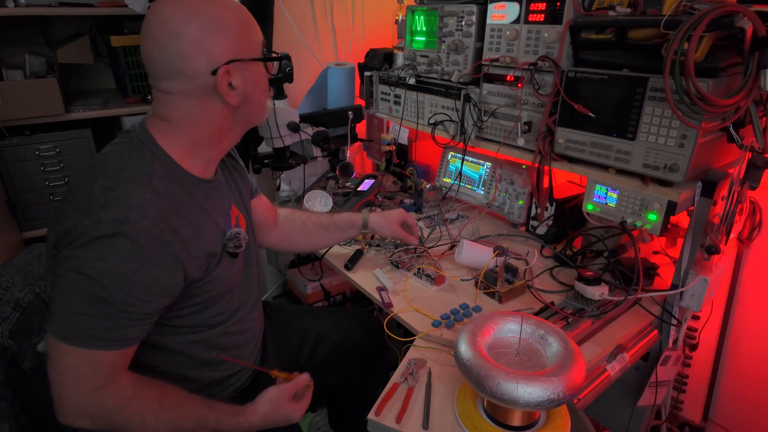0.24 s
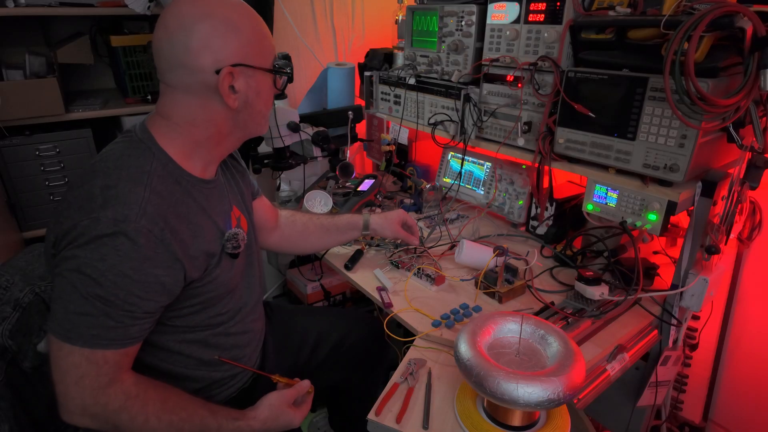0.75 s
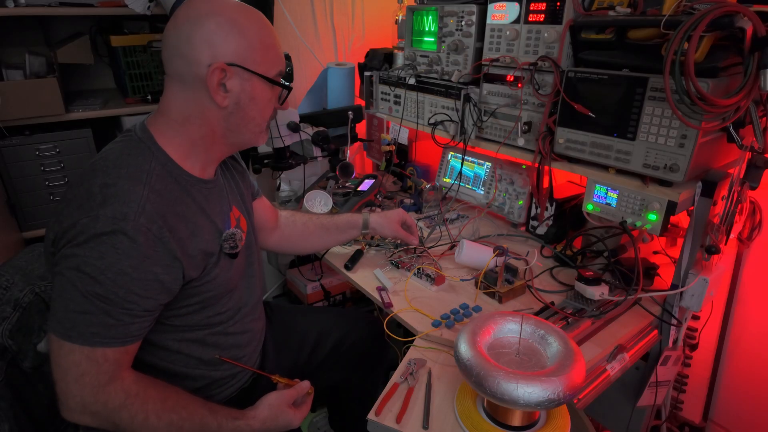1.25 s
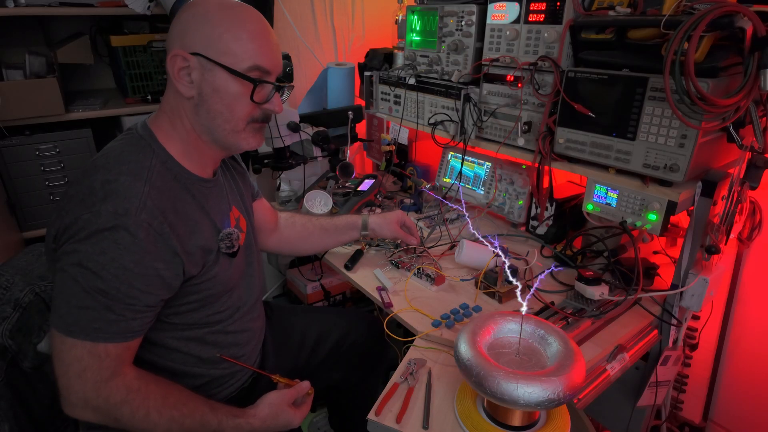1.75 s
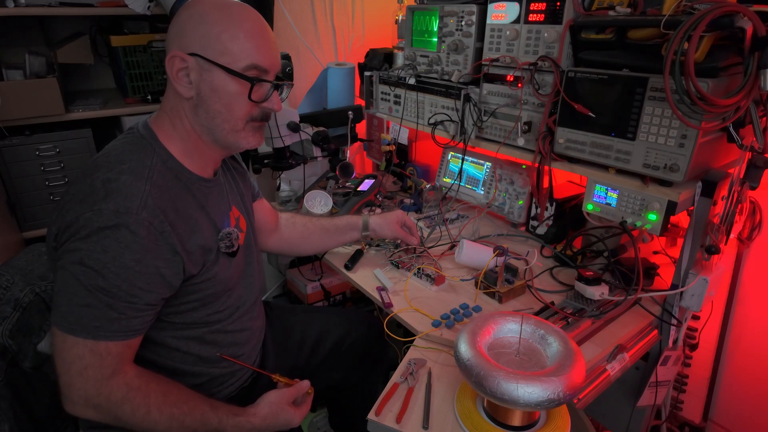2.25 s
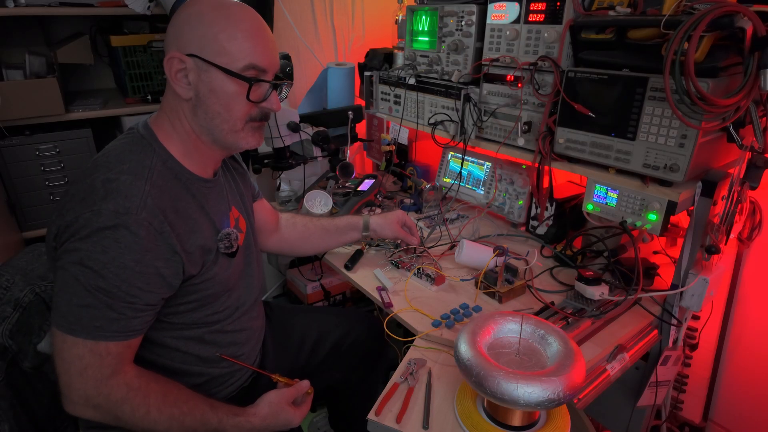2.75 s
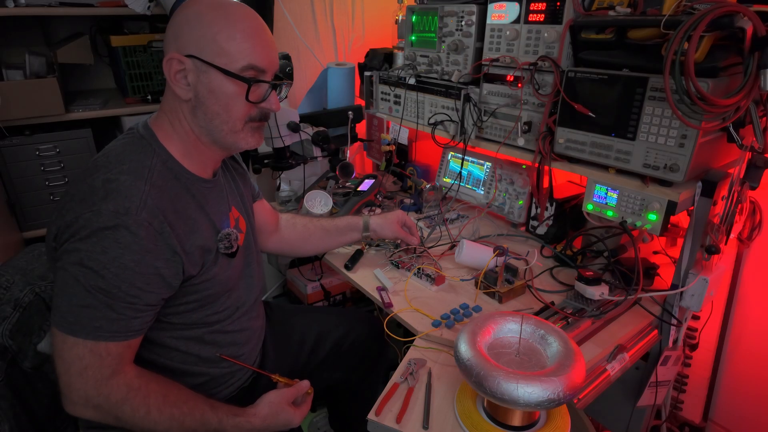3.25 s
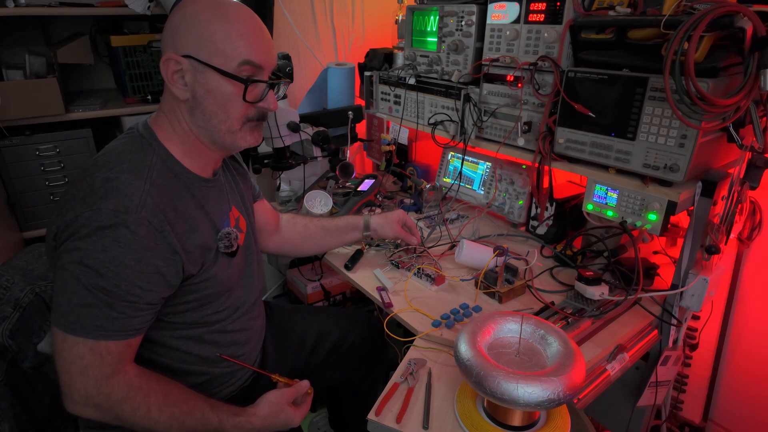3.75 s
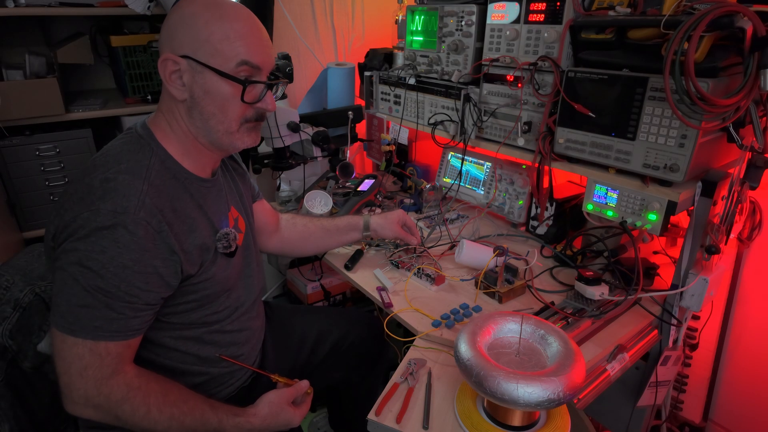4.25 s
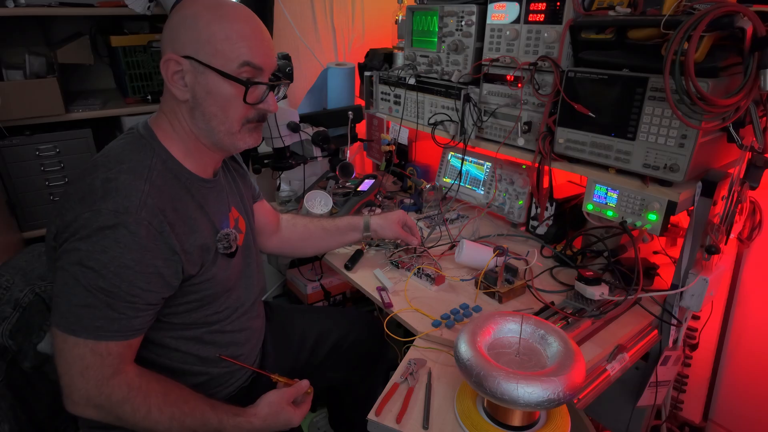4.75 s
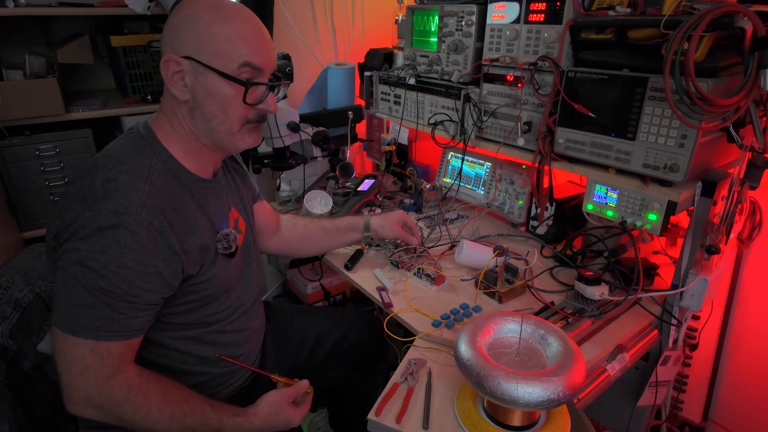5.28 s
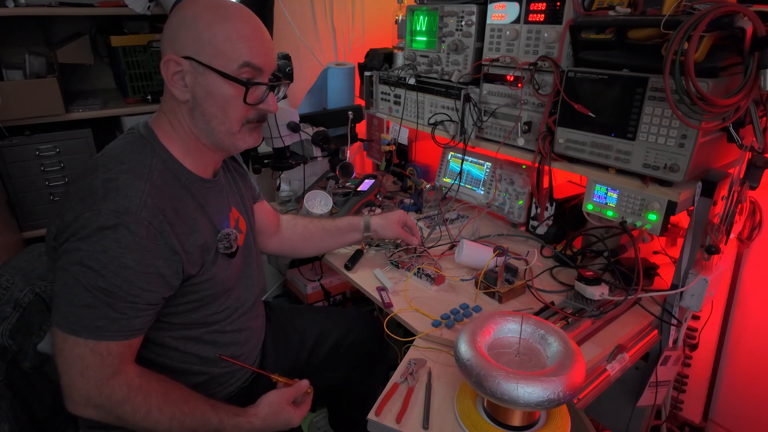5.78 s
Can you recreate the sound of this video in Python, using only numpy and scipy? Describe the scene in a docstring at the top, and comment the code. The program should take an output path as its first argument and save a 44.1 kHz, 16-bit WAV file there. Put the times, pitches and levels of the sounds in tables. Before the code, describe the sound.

Hard electric spark cracks snap about twice a second in a small workshop over faint fan hum, with one brief buzzing, squealing arc midway.

```python
"""A small spark coil on an electronics bench fires about twice a second in a small workshop.
Each burst is a snap and a thump as the arc breaks out, then a loud crack about 5 ms later.
One burst holds its arc: it buzzes at twice the mains rate, snaps again five times and squeals.
Snaps are short pulses, thumps are dying sine waves, and the room's echo is noise that fades away.
Small clicks are short noise with a ring; instrument fans below are shaped noise and wavering tones."""
import sys
import numpy as np
from scipy import signal
from scipy.fft import rfft, irfft
from scipy.io import wavfile
from scipy.ndimage import uniform_filter1d, minimum_filter1d

SR = 44100
rng = np.random.default_rng(int(sys.argv[2]) if len(sys.argv) > 2 else 0)


def pcm_store(signal):
    """Save signal as 16-bit PCM."""
    levels = np.round(np.clip(np.atleast_2d(signal), -1, 1) * 32767)
    wavfile.write(sys.argv[1], SR, levels.astype(np.int16).T)


N = 265482
T = np.arange(N) / SR  # time in the scene [s]
AGE = T[:16384]  # time since one short event began [s]


def undb(db):
    """Turn decibels into a factor for sound pressure."""
    return 10 ** (np.asarray(db) / 20)


def unit(x):
    """Scale a signal to rms 1."""
    return x / np.sqrt(np.mean(x ** 2))


def add(out, start_s, x):
    """Mix x into out from a given time on, cutting off what runs past the end."""
    i = max(0, int(round(start_s * SR)))
    out[i:i + len(x)] += x[:max(0, N - i)]


def gains(colour, size):
    """Read a colour's gain at each frequency of a transform, with straight lines over log frequency."""
    hz, db = np.transpose(colour)
    log_hz = np.log(np.fft.rfftfreq(size, 1 / SR) + 1)
    return undb(np.interp(log_hz, np.log(hz), db))


def noise(colour, size):
    """Shape white noise with a colour, at rms 1."""
    white = rng.standard_normal(size)
    return unit(irfft(rfft(white) * gains(colour, size), size))


def click(colour):
    """Make a pulse of a given colour whose energy comes as early as possible (minimum phase)."""
    # folding the cepstrum onto positive times moves all the energy to the front
    cepstrum = irfft(np.log(gains(colour, len(AGE))))
    cepstrum[1:len(AGE) // 2] *= 2
    cepstrum[len(AGE) // 2 + 1:] = 0
    pulse = irfft(np.exp(rfft(cepstrum)))
    return pulse / np.sqrt(np.mean(pulse[:25] ** 2))  # rms 1 over the first half millisecond or so


def walk(rate_hz):
    """Wander smoothly at random, with a spread near 1."""
    k = int(SR / rate_hz)
    steps = np.repeat(rng.standard_normal(N // k + 1), k)
    return unit(uniform_filter1d(uniform_filter1d(steps, k), k)[:N])


def gate(start_s, attack_s, hold_s, release_s):
    """Rise, hold and fall in straight lines."""
    corners = start_s + np.cumsum([0, attack_s, hold_s, release_s])
    return np.interp(T, corners, [0, 1, 1, 0])


def fade(t60, hold_s):
    """The echo stays nearly level at first, as under a recovering limiter, then falls steadily."""
    return undb(-60 * (np.hypot(AGE, hold_s) - hold_s) / t60)


def thump(hz, t60, delay_s):
    """A pressure swing that dies away: a sine losing 60 dB in t60 seconds."""
    age = np.maximum(AGE - delay_s, 0)
    return np.sin(2 * np.pi * hz * age) * undb(-60 * age / t60)


FIRST_S, PERIOD_S, BURST_S = .0015, .45939, .0048  # first burst, spacing, length of a burst [s]
# one burst holds its arc: its place in the row (from 0), its length [s], delay of later bursts [s]
LONG_INDEX, ARC_S, DELAY_S = 7, .0832, .08
ARC_START_S = FIRST_S + LONG_INDEX * PERIOD_S
ARC_END_S = ARC_START_S + ARC_S
# strength of each burst in turn: (opening snap and thump [dB], closing boom and branches [dB])
BURST_LEVELS = [(-19, -11), (-24.5, -12), (-18, -9.5), (-19, -8), (-17, -7.5), (-20.5, -11.5), (-12.5, -7),
                (-10, -12.5), (-18.5, -13.5), (-19.5, -7.5), (-20, -8.5), (-20, -11), (-9.5, -5.5)]


def timing():
    """Bursts are evenly spaced, but the long arc holds the timer up: all later ones come 0.08 s late."""
    turn = np.arange(len(BURST_LEVELS))
    starts = FIRST_S + turn * PERIOD_S + DELAY_S * (turn > LONG_INDEX)
    ends = starts + np.where(turn == LONG_INDEX, ARC_S, BURST_S)
    return starts, ends


FANS_DB, HISS_DB = -47, -69.5  # rushing air before its small drift, and faint hiss [dB]
HISS_CYCLE = 3  # the hiss follows two bursts out of every three
# colour of the rushing air: (frequency [Hz], relative level [dB])
FAN_COLOUR = [(30, -19), (70, -26), (100, -18), (140, -13.5), (210, -10), (300, -3.5), (390, -0.5),
              (470, -5.5), (600, -14.5), (950, -16), (1300, -22.5), (1750, -30.5), (3500, -38.5),
              (16000, -49)]
# steady tones of the fans, before a small drift: (frequency [Hz], rms level [dB])
FAN_TONES = [(140.0, -65), (161.5, -64.5), (414.5, -50.5), (834.4, -67.5), (947.5, -73.5), (1007, -66),
             (1066, -76), (1184, -67), (2056, -85)]


def bench():
    """Fans: rushing air and slightly wavering tones; a faint hiss comes and goes from burst to burst."""
    air = undb(FANS_DB + .5 * walk(4.3)) * noise(FAN_COLOUR, N)
    hum = 0
    for hz, db in FAN_TONES:
        phase = 2 * np.pi * np.cumsum(hz + .8 * walk(9)) / SR
        hum = hum + np.sqrt(2) * undb(db + 1.2 * walk(1.9)) * np.sin(phase)
    fired = np.searchsorted(timing()[0], T)  # bursts begun so far
    hissing = (fired % HISS_CYCLE > 0) & (fired < len(BURST_LEVELS))
    hiss = undb(HISS_DB) * hissing * rng.standard_normal(N)
    return air + hum + hiss


# small clicks on the bench: (time [s], level [dB])
CLICK_EVENTS = [(4.115, -58), (5.7405, -45), (5.7851, -40.5), (5.7866, -29)]
# colour of a click: (frequency [Hz], relative level [dB])
CLICK_COLOUR = [(200, -6.5), (1200, -1), (2100, -4), (3200, 3.5), (4200, -3), (5200, -4), (7500, -4),
                (11000, -18.5), (16000, -26)]
# ring of the small hard part: (frequency [Hz], relative level [dB])
PART_TONES = [(1700, -6), (3133, 1), (3957, -5), (5378, -8)]


def clicks():
    """A small hard part, perhaps a switch, ticks on the bench, rings briefly, and the room answers."""
    out = np.zeros(N)
    tones = sum(undb(db) * thump(hz, t60=0.11, delay_s=0) for hz, db in PART_TONES)
    ring = undb(-17.5) * tones
    for start_s, db in CLICK_EVENTS:
        tick = np.exp(-AGE / 0.0014)
        room_answer = undb(-16.5) * undb(-60 * AGE / 0.19)
        rattle = (tick + room_answer) * noise(CLICK_COLOUR, len(AGE))
        add(out, start_s, undb(db) * (rattle + ring))
    return out


# colour of the room's echo: (frequency [Hz], relative level [dB])
ROOM_COLOUR = [(100, -7), (400, 3.5), (1100, 0), (1800, -1), (3300, 1), (4200, -4), (6000, 0), (7500, -3),
               (10000, -14), (13000, -25), (16000, -32.5)]


def reflections():
    """Diffuse echo of the workshop: fading noise, grainy with small reflections."""
    grain = unit(undb(1.3 * walk(350)[:len(AGE)]))
    onset = 1 - np.exp(-AGE / 0.00055)
    return grain * noise(ROOM_COLOUR, len(AGE)) * fade(t60=0.19, hold_s=0.051) * onset


# standing waves of the workshop: (frequency [Hz], relative level [dB])
ROOM_TONES = [(113.0, -7), (135.0, 1.5), (178.0, 1), (205, -8), (266.0, -6), (327.0, -8), (370.0, -7.5),
              (417.0, -8), (447.0, -3), (480.0, -7.5), (505.0, -14.5), (581.0, -1.5), (666.0, -6.5),
              (708.0, -11.5), (828.0, -5), (869.0, -5), (915.0, -10.5), (973.0, -6), (1004.0, -12),
              (1047.0, -3), (1096.0, -7), (1137.0, -11), (1215.0, -4), (1315.0, -13.5), (1377.0, -10),
              (1497, -11.5), (1612, -15.5), (2555, -9.5)]


def standing_waves(t60, delay_s):
    """Air between the walls rings at set pitches, which build up and die away together."""
    age = np.maximum(AGE - delay_s, 0)
    ring = 0
    for hz, db in ROOM_TONES:
        # long waves start nearly together, short ones arrive scattered
        phase = rng.uniform(-np.pi, np.pi) * min(1, (hz / 450) ** 2)
        ring = ring + undb(db) * np.cos(2 * np.pi * hz * age + phase)
    return ring * undb(-60 * age / t60) * (1 - np.exp(-age / 0.0039))


ARC_HZ = 100.25  # supply ripple, twice the mains rate
# the squeal swells quickly, holds, then drops to a weak whistle until the arc dies
SQUEAL_START_S, SQUEAL_ATTACK_S, SQUEAL_HOLD_S, SQUEAL_RELEASE_S = 3.268, .004, .0165, .003
SQUEAL_HZ = 2702  # centre of its wavering pitch
SQUEAL_DB, WHISTLE_DB = -18.5, -35  # strength before the level of each partial [dB]
# buzz of the long arc, before a small drift: (multiple of the ripple, rms level [dB])
BUZZ_PARTIALS = [(1, -22), (2, -43.5), (3, -24), (4, -39), (5, -32.5), (6, -38.5), (7, -39.5)]
# partials of the squeal: (multiple of its pitch, relative level [dB])
SQUEAL_PARTIALS = [(1, -2), (2, -2), (3, -9.5), (4, -25.5)]
# low colour of the sizzle: (frequency [Hz], relative level [dB])
RUMBLE_COLOUR = [(60, -22.5), (150, -0.5), (450, 0.5), (900, -6), (1600, -14), (5000, -37), (16000, -53.5)]


def long_arc():
    """A held arc swells with the supply ripple, sizzles, and breaks into a squeal before it goes out."""
    burning = np.clip(np.minimum(T - ARC_START_S, ARC_END_S - T) / .001, 0, 1)
    ripple = 2 * np.pi * ARC_HZ * (T - ARC_START_S)
    # the channel swells once a ripple; its upper harmonics waver as the arc writhes
    buzz = 0
    for k, db in BUZZ_PARTIALS:
        waver = (k / 4.5) ** 3 * walk(40)
        buzz = buzz + np.sqrt(2) * undb(db + 1.0 * walk(70)) * np.cos(k * ripple + waver)
    sizzle = undb(-34) * noise(ROOM_COLOUR, N) + undb(-33) * noise(RUMBLE_COLOUR, N)

    loud = undb(SQUEAL_DB) * gate(SQUEAL_START_S, SQUEAL_ATTACK_S, SQUEAL_HOLD_S, SQUEAL_RELEASE_S)
    whistle = undb(WHISTLE_DB) * burning * (T > SQUEAL_START_S)
    drive = np.maximum(loud, whistle)
    phase = 2 * np.pi * np.cumsum(SQUEAL_HZ + 17 * walk(200)) / SR
    # overtones grow only when the oscillation is driven hard
    hard = drive / drive.max()
    squeal = 0
    for k, db in SQUEAL_PARTIALS:
        squeal = squeal + drive * undb(db) * hard ** ((k - 1) / 2) * np.cos(k * phase)
    echo = reflections()
    squeal_echo = signal.fftconvolve(squeal, echo / np.linalg.norm(echo))[:N]
    return burning * (buzz + sizzle) - squeal + undb(-17) * squeal_echo


RESTRIKE_AFTER_S, RESTRIKE_COUNT = .0116, 5  # first restrike after the arc begins [s], how many
RESTRIKE_DB, RESTRIKE_FALL_DB = -14.5, 1.5  # first strike, drop from one to the next [dB]
# colour of a snap: (frequency [Hz], relative level [dB])
SNAP_COLOUR = [(100, -23), (1000, -11.5), (3000, -11.5), (4500, -11.5), (6500, -2), (8000, -8.5),
               (11000, -21), (16000, -29.5)]


def sparks():
    """The long arc strikes afresh once per ripple, weaker each time as its channel heats up."""
    out = np.zeros(N)
    snap = click(SNAP_COLOUR)
    for k in range(RESTRIKE_COUNT):
        crackle = undb(-4.0) * noise(ROOM_COLOUR, len(AGE)) * np.exp(-AGE / 0.0014)
        strike = snap + crackle + undb(-20) * reflections()
        level = undb(RESTRIKE_DB - k * RESTRIKE_FALL_DB)
        add(out, ARC_START_S + RESTRIKE_AFTER_S + k / ARC_HZ, level * strike)
    return out


# echo of a crack: level for a closing level of 0 dB [dB], gain per dB of closing level [dB]
ECHO_DB, ECHO_SLOPE = -25, 0.21
# colour of a crack: (frequency [Hz], relative level [dB])
CRACK_COLOUR = [(40, -9.5), (150, 1), (500, 3), (1500, 2.5), (4200, -3), (6500, 0), (8000, -5.5),
                (11000, -17.5), (16000, -34.5)]


def bursts():
    """Snap and thump as the arc breaks out; a crack of opposite sign as it collapses."""
    out = np.zeros(N)
    snap, crack = click(SNAP_COLOUR), click(CRACK_COLOUR)
    # the heated channel swells and falls back
    opening = snap + undb(3.0) * thump(hz=263.5, t60=.014, delay_s=0.00051)
    boom = undb(3.0) * thump(hz=206, t60=0.011, delay_s=0.00035)
    boom = boom + undb(-7.5) * thump(hz=416, t60=0.021, delay_s=0.00038)
    # the coil stays in one place, so every crack rings the room's tones the same way
    boom = boom + undb(-17) * standing_waves(t60=0.19, delay_s=.001)
    # sound from further along the crooked channel comes in a little later
    channel = AGE / 0.00062 * np.exp(1 - AGE / 0.00071)
    # every arc takes a new path: long waves echo alike each time, short ones afresh
    alike = 1 / (1 + (np.fft.rfftfreq(len(AGE), 1 / SR) / 2200) ** 2)
    walls = rfft(reflections())
    for start, end, (snap_db, crack_db) in zip(*timing(), BURST_LEVELS):
        add(out, start, undb(snap_db) * (opening + undb(-13) * reflections()))
        branches = undb(-4.0) * channel * noise(CRACK_COLOUR, len(AGE))
        # the sharp edge of the crack is equally strong in every burst
        add(out, end, undb(crack_db) * (boom + branches) - undb(-9) * crack)
        fresh = rfft(reflections())
        echo = irfft(np.sqrt(alike) * walls + np.sqrt(1 - alike) * fresh)
        add(out, end, undb(ECHO_DB + ECHO_SLOPE * crack_db) * echo)
    # so small a source radiates little deep bass
    return signal.sosfilt(signal.butter(2, 80, "high", fs=SR, output="sos"), out)


def scene():
    """Every source reaches both sides; the right is a little louder, most of all in the bass."""
    sound = bench() + clicks() + long_arc() + sparks() + bursts()
    bass = signal.sosfilt(signal.butter(1, 350, fs=SR, output="sos"), sound)
    lean = 0.014 * sound + .046 * bass
    return np.array([sound - lean, sound + lean])


TOP_HZ = 15800  # the treble is cut above this


def record(dry):
    """The microphone sheds deep bass; a fast limiter holds the cracks down; the top is cut."""
    thinned = signal.sosfilt(signal.butter(2, 75, "high", fs=SR, output="sos"), dry)
    ceiling = .87
    allowed = ceiling / np.maximum(np.abs(thinned).max(axis=0), ceiling)
    # one gain for both sides, smoothed over about a millisecond
    gain = uniform_filter1d(minimum_filter1d(allowed, size=41), size=41)
    return signal.sosfilt(signal.ellip(8, .2, 90, TOP_HZ, fs=SR, output="sos"), gain * thinned)


dry = scene()
out = record(dry)
pcm_store(out)
```